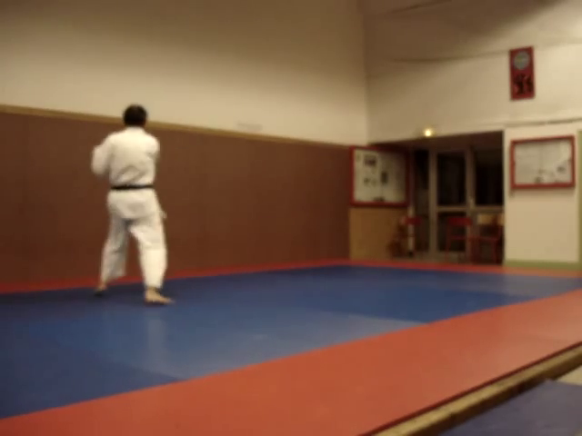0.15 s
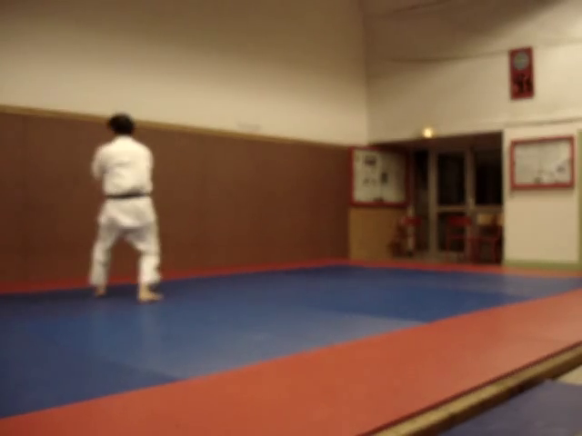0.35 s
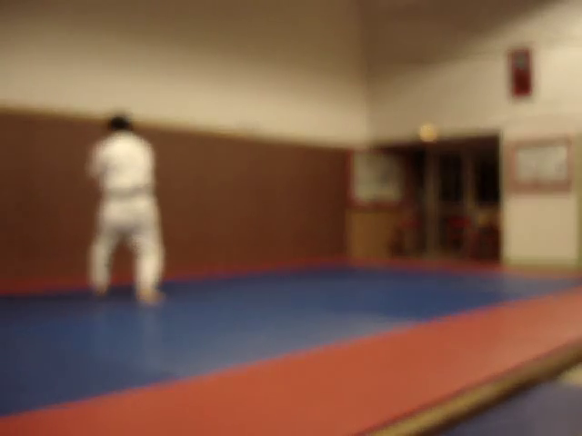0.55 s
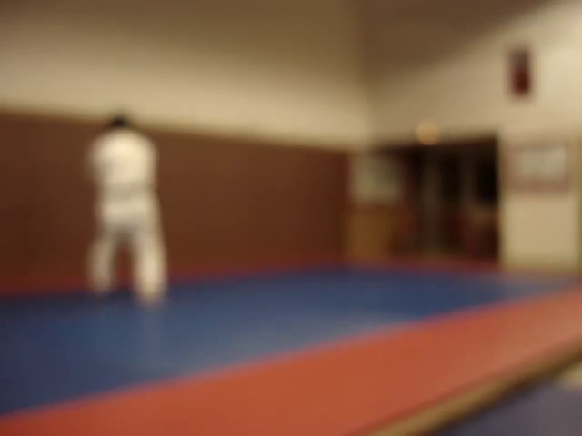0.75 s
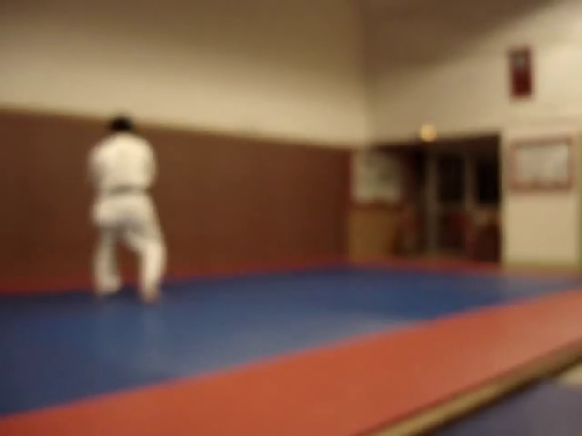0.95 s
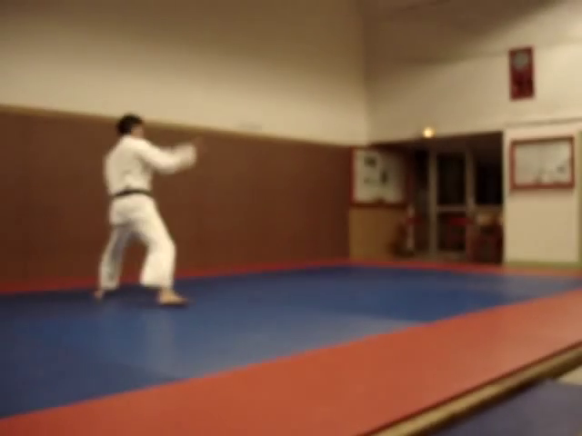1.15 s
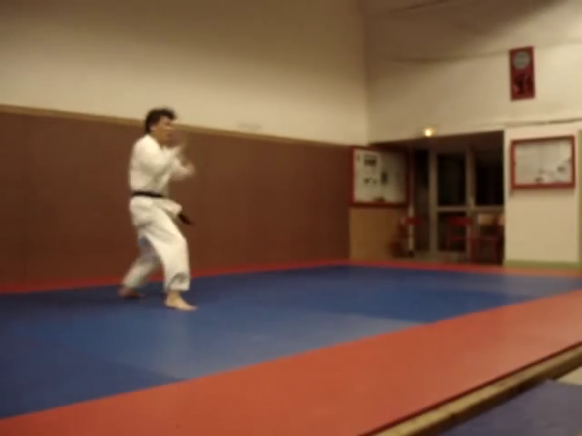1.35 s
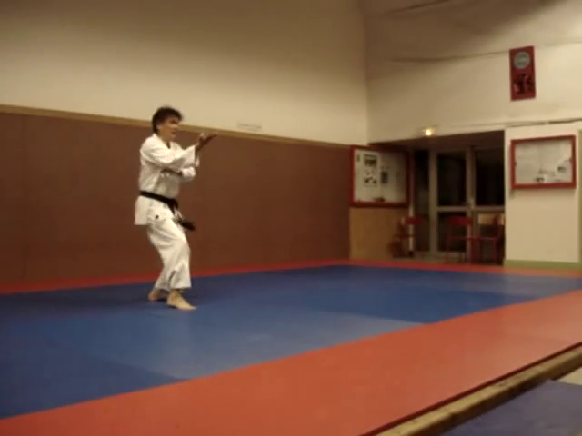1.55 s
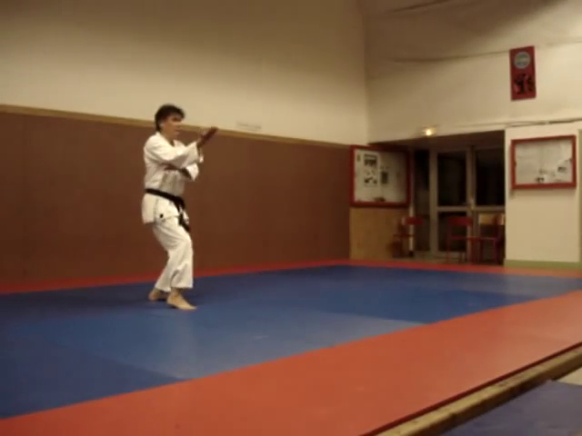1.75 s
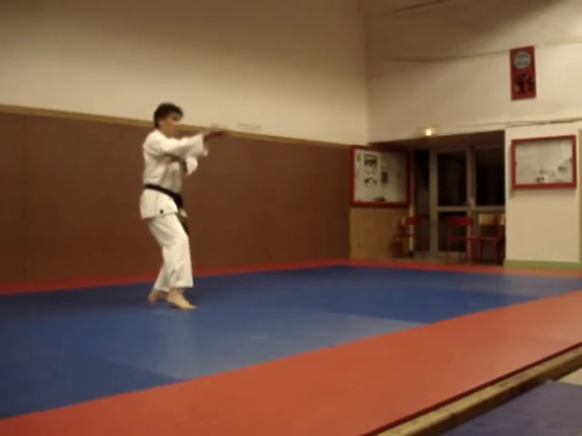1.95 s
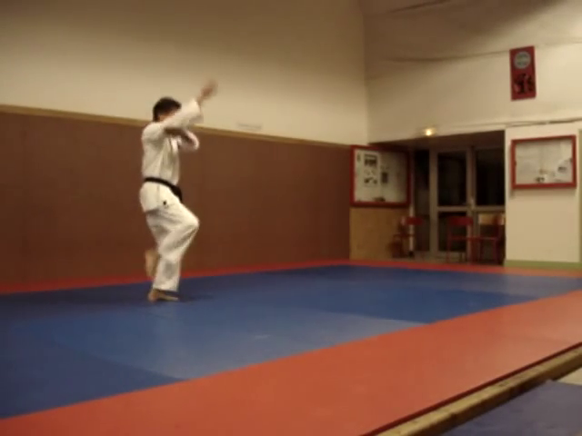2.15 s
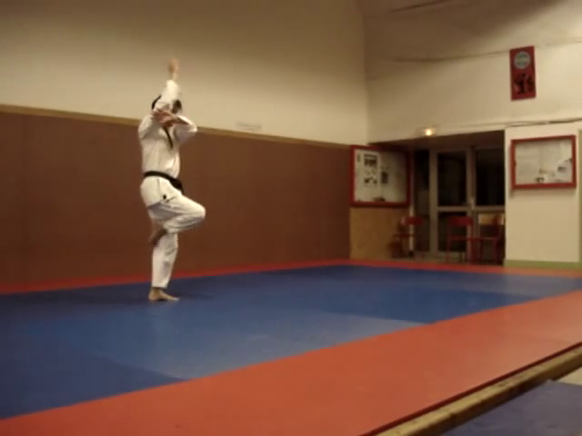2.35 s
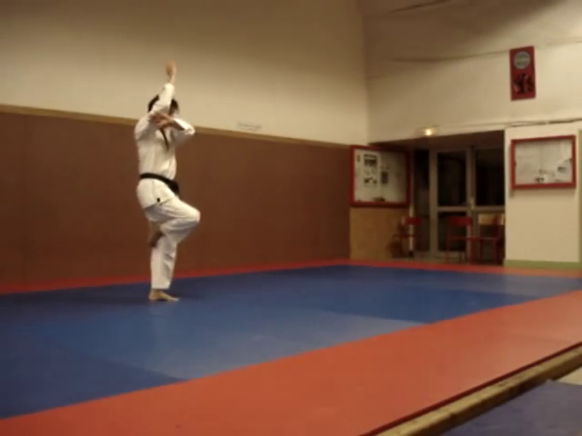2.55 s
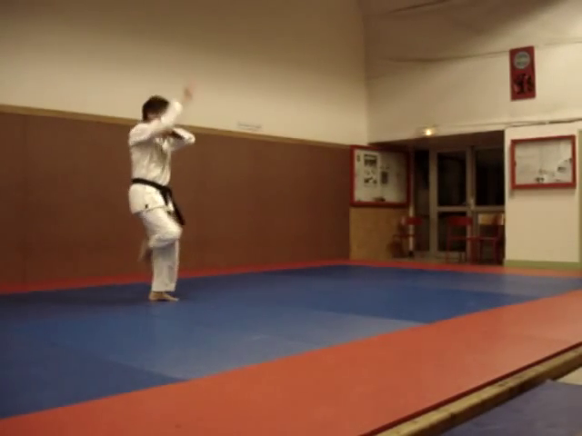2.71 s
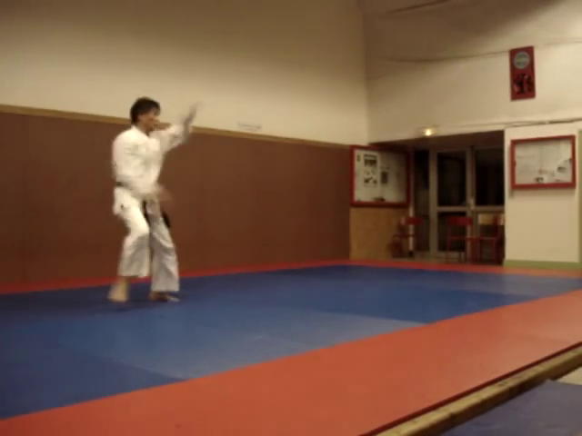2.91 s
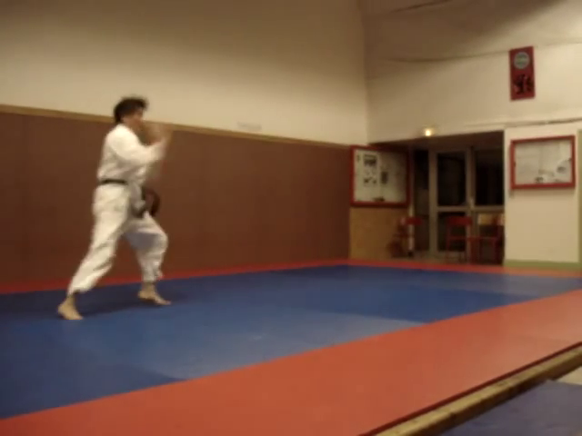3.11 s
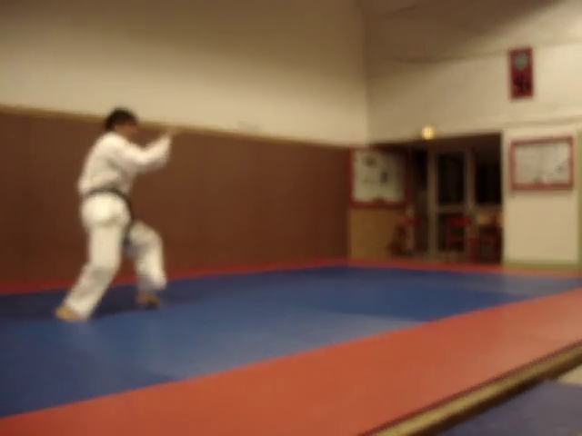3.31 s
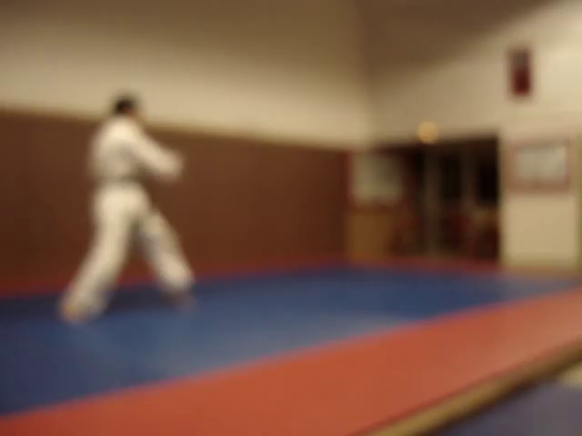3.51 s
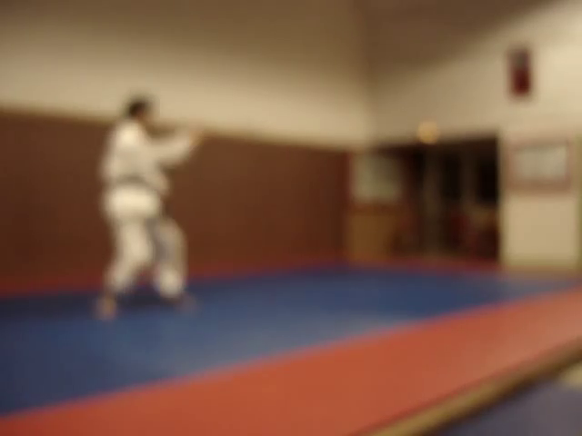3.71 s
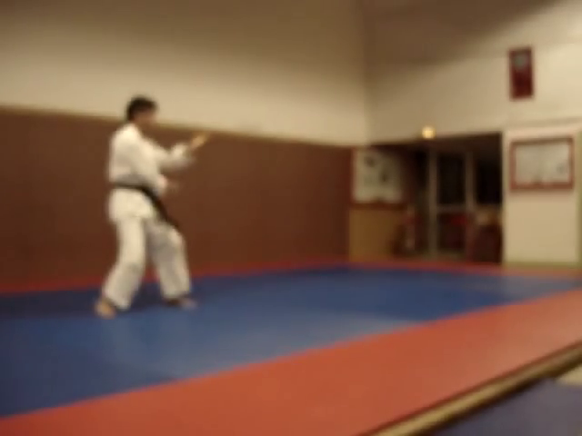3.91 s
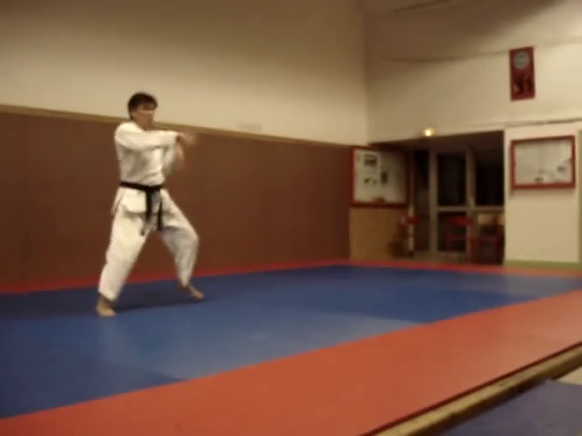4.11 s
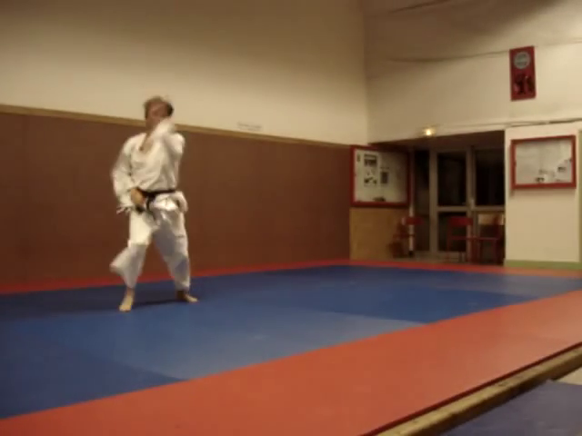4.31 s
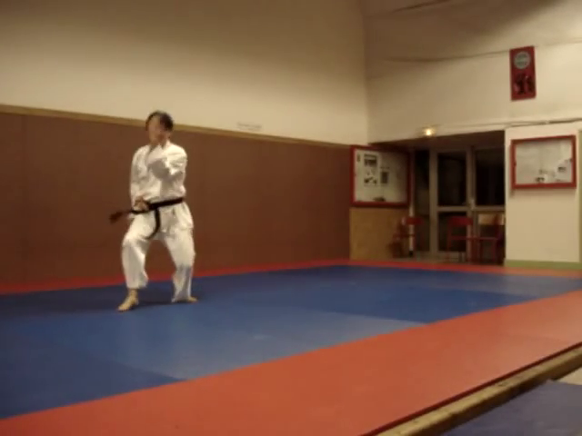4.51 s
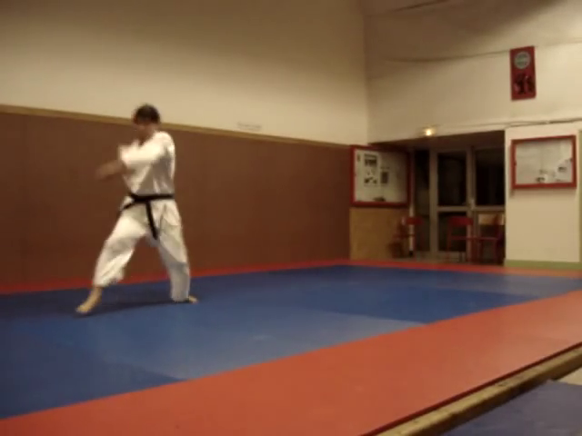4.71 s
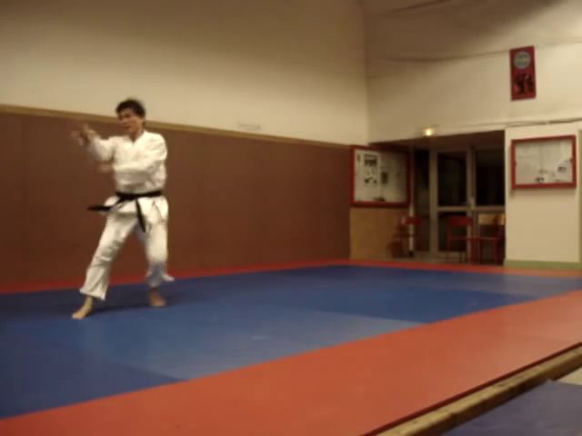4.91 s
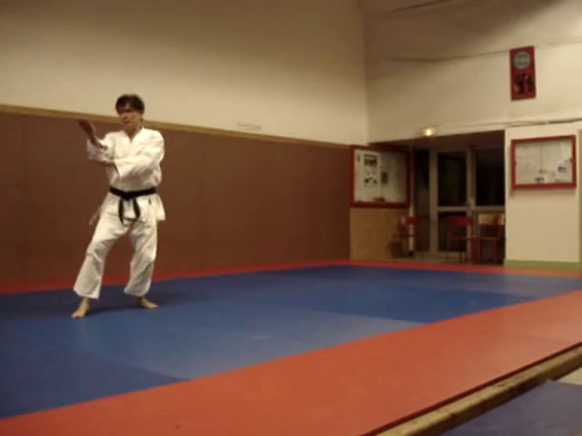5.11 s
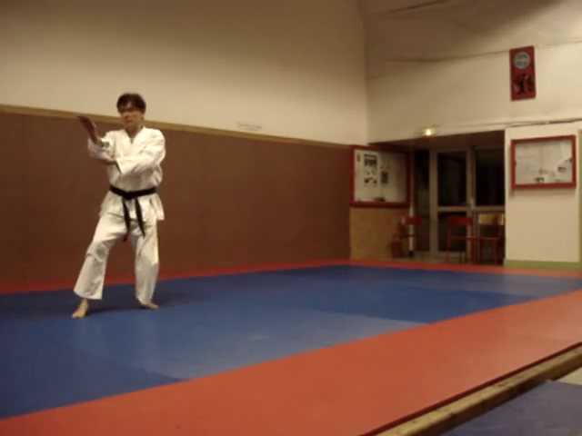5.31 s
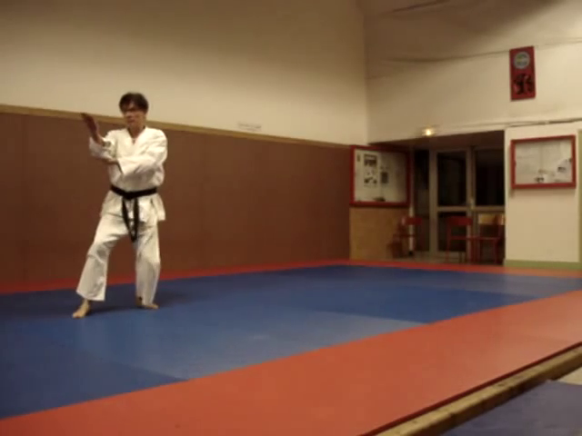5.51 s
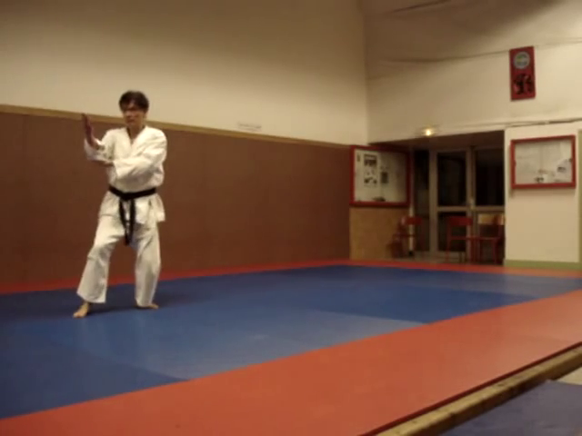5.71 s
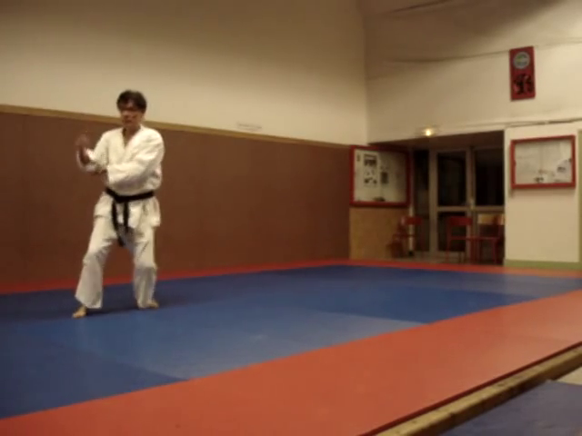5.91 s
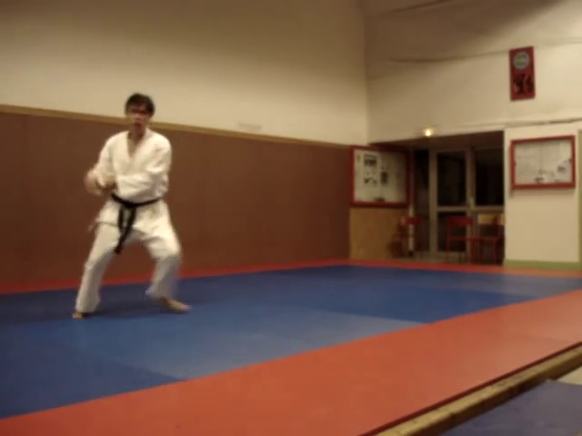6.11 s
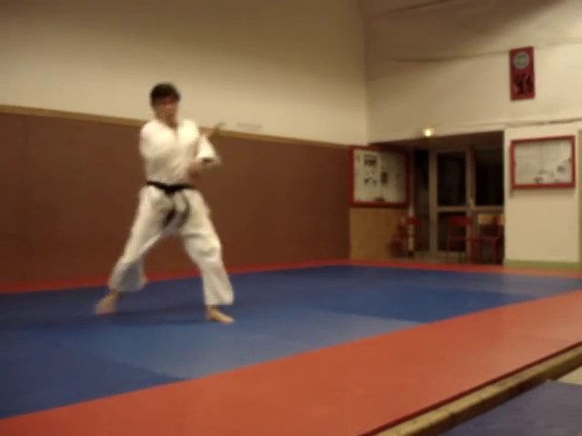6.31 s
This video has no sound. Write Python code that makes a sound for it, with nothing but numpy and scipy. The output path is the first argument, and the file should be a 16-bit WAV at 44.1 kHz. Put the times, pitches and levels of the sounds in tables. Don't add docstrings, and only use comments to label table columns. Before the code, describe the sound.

Stiff cotton flaps, rustles and snaps tight around fast limb movements, while bare heels land softly on sprung matting. Between bursts, bare skin drags and turns with faint beaded whistles; a short chirp and longer squeak come late. The strongest crack falls past the middle, and the end brings one more step and swish. Everything rings in a bare hall, heard from afar through dull, hissy pickup with a thin high whine.

```python
import sys
import numpy as np
from scipy import signal
from scipy.fft import rfft, irfft
from scipy.io import wavfile
from scipy.ndimage import uniform_filter1d, map_coordinates

SR = 44100
rng = np.random.default_rng(int(sys.argv[2]) if len(sys.argv) > 2 else 0)


def ratio_of_db(decibels):
    return 10 ** (np.asarray(decibels, float) / 20)


def to_wav(sig):
    pcm = np.clip(np.atleast_2d(sig), -1, 1) * 32767
    pcm = np.round(pcm).astype(np.int16)
    wavfile.write(sys.argv[1], SR, pcm.T)


N = 280035

# [f/Hz, time to fall 60 dB/s]
HALL_RING = [(60, 0.65), (200, 0.5), (700, 0.86), (2500, 1.62), (5000, 1.74), (10000, 0.52)]
# [t/s, peak level/dB, f of the push/Hz, floor drum share 0-1]
HEELS = [(0.15, -19, 220, 0.02), (0.379, -35.5, 92, 0.4), (0.776, -43.5, 217, 0.37), (1.331, -47, 218, 0.1),
         (1.533, -32.5, 174, 0.52), (3.045, -38, 213, 0.1), (3.133, -36, 158, 0.3), (3.586, -36, 142, 0.1),
         (3.727, -25, 169, 0.32), (4.206, -34, 166.6, 0), (4.305, -22.5, 171, 0.1), (4.622, -39, 202, 0),
         (4.756, -47, 174, 0.2), (4.852, -27.5, 184, 0.28), (5.061, -38, 136, 0.33),
         (6.322, -23.5, 174, 0.4)]
# [f/Hz, level per Hz/dB]
FLAP_COLOUR = [(60, -38.5), (150, -17), (250, -5), (440, 1), (600, -1), (900, 2), (1300, -2), (1900, -7.5),
               (4000, -71)]
# [f/Hz, level per Hz/dB]
RUSTLE_COLOUR = [(600, -55.5), (1200, -7), (1600, -4), (2100, 3), (2800, 2), (3700, -3.5), (4500, -5.5),
                 (6000, -14), (9000, -60.5)]
# [f/Hz, level per Hz/dB]
HISS_COLOUR = [(2000, -38), (3800, -3), (5000, 3.5), (6500, 3), (8000, -1), (10000, -5), (12000, -24)]


def unit(x):
    return x / np.sqrt(np.mean(x ** 2) + 1e-20)


def along(points, hz):
    f, v = np.transpose(points)
    return np.interp(np.log(hz + 1), np.log(f + 1), v)


def causal(points, size=2048):
    colour = ratio_of_db(along(points, np.fft.rfftfreq(size, 1 / SR)))
    cepstrum = irfft(np.log(colour + 1e-6), size)
    cepstrum[1:size // 2] *= 2
    cepstrum[size // 2 + 1:] = 0
    h = irfft(np.exp(rfft(cepstrum)), size)
    return h / np.linalg.norm(h)


def narrow(hz, width_hz, size):
    f = np.fft.rfftfreq(size, 1 / SR)
    band = 1 / (1 + ((f - hz) / width_hz) ** 2)
    return unit(irfft(rfft(rng.standard_normal(size)) * band, size))


def peaked(t, s, rise_s, fall_s):
    return ratio_of_db(-20 * np.maximum((s - t) / rise_s, (t - s) / fall_s))


def folds(db, fineness, loss_db):
    steps_away = np.abs(np.arange(3) - fineness)
    return db - loss_db * steps_away ** 1.23


def still_air():
    # [f/Hz, level per Hz/dB]
    air_colour = [(88, -36), (150, -2), (462, 2), (580, -1.5), (1420, -4), (1530, -4), (6790, -13),
                  (7960, -13), (10000, -21.5), (13000, -73.5), (22000, -120)]
    # [f/Hz, level per Hz/dB]
    rumble_colour = [(20, -1.5), (60, 0), (130, -1), (220, -8.5), (400, -28)]
    # [f/Hz, width/Hz, level/dB]
    whines = [(8015, 45, -69), (380, 60, -68)]
    # [f/Hz, level/dB]
    whine_core = (8030, -66)
    t = np.arange(N) / SR
    hiss, drone = (signal.fftconvolve(rng.standard_normal(N + SR), causal(c))[SR // 2:][:N]
                   for c in (air_colour, rumble_colour))
    shake_db, shake_rise_s, shake_t60_s = -16.5, 0.04, 1.8
    rumble_power = ratio_of_db(-67.5) ** 2
    for s, db, _, share in HEELS:
        shake = peaked(t, s + shake_rise_s, shake_rise_s, shake_t60_s / 3)
        rumble_power = rumble_power + (ratio_of_db(db + shake_db) * share * shake) ** 2
    core_hz, core_db = whine_core
    out = ratio_of_db(-50) * hiss + np.sqrt(rumble_power) * drone
    out += ratio_of_db(core_db) * np.sqrt(2) * np.sin(2 * np.pi * core_hz * t)
    for hz, width, db in whines:
        out += ratio_of_db(db) * narrow(hz, width, size=N)
    return out


def motion(t):
    # [t of fastest motion/s, level/dB,
    # fineness 0 flap - 1 rustle - 2 hiss, wind-up and fall per 20 dB/s (sign ignored)]
    sweeps = [(.01, -49.5, 1.2, -4.6), (.12, -34.5, 0, .08), (.22, -21.5, 0.49, 0.0855),
              (.3, -20.5, 0.16, 0.1521), (.42, -35, 1.1, 0.17), (.6, -48, 0.59, 0.9), (1.16, -46, 0.7, .15),
              (1.26, -34, 0, 0.2), (1.35, -24, .2, 0.09), (1.5, -24, 0.21, 0.1), (1.58, -32.5, 1.1, 0.13),
              (1.75, -50, 1.3, 0.4), (2.2, -55, .8, 0.23), (2.97, -43, 0.34, 0.03),
              (3.04, -21.5, 0.19, 0.0246), (3.105, -28.5, 2, 0.034), (3.188, -25, 1.25, 0.0637),
              (3.24, -26, 0.048, 0.0926), (3.46, -42, 0.35, 0.4), (3.66, -29, 0.2, 0.2),
              (3.73, -30, 0, 0.1652), (3.78, -26.5, 0.79, .06), (4.19, -42.5, 0, 0.2),
              (4.32, -29, 0.085, 0.15), (4.52, -41.5, 0.42, 0.95), (4.78, -35, 0.48, 0.39),
              (4.921, -22.5, 0.8, 0.0675), (5.005, -23.5, 0.11, 0.0619), (5.15, -35, 3.14, 0.27),
              (6.269, -36, 0.44, 0.17),
              (.2, -40, 2, -0.33), (.3, -37, 2, 0.01), (1.52, -35.5, 2, 0.05), (3.62, -39.5, 1, 0.4),
               (4.28, -37.5, 1.6, 0.12), (4.42, -32, .05, 0.07), (4.47, -35, 0.47, 0.02),
               (4.96, -27.5, 1.8, 0.11), (5.019, -28.5, 2, .09), (6.19, -46, .6, -0.25),
               (6.315, -31, 2.04, 0.07), (6.345, -25.5, .1, 0.073)]
    next_fold_db = 7.5
    power = ratio_of_db(folds(-65, 0.41, next_fold_db))[:, None] ** 2
    for s, db, fineness, wind_s in sweeps:
        gains = ratio_of_db(folds(db, fineness, next_fold_db))
        power = power + np.outer(gains, peaked(t, s, wind_s, wind_s)) ** 2
    return np.sqrt(power)


def rustling():
    hz, frames, wash = signal.stft(rng.standard_normal(N), SR, nperseg=256)
    near, power = np.zeros(N), 0
    colours, direct_shares = (FLAP_COLOUR, RUSTLE_COLOUR, HISS_COLOUR), (0.4, 0.45, 0.6)
    for gain, colour, direct in zip(motion(frames), colours, direct_shares):
        grains = unit(rng.standard_normal(N) * ratio_of_db(8.1 * rng.standard_normal(N)))
        moving = grains * np.interp(np.arange(N) / SR, frames, gain)
        near += direct * signal.fftconvolve(moving, causal(colour))[:N]
        power += np.outer(unit(ratio_of_db(along(colour, hz))), gain) ** 2
    release = ratio_of_db(-60 * frames / along(HALL_RING, hz)[:, None]) ** 2
    release /= release.sum(axis=1, keepdims=True)
    stored = signal.fftconvolve(power, release, axes=1)[:, :len(frames)]
    return near + signal.istft(wash * np.sqrt(np.abs(stored)), SR, nperseg=256)[1][:N]


def snaps():
    # [t/s, level/dB, fineness 0-2, smear/ms]
    cracks = [(.136, -32, 0.33, 7.7), (.151, -15, .03, 11), (.163, -19, 0.68, 5.7),
              (.178, -22.5, -0.25, 6.6), (.184, -25, 1.77, 2.5), (.196, -15.5, 0.067, 16),
              (.237, -17.5, 0.32, 14), (1.3265, -21.5, 0.54, 1.1), (1.331, -21, .3, 1.1),
              (1.341, -17.5, 0.62, 19), (1.387, -19.5, 0.81, 3.6), (2.07, -40.5, 1.5, 4),
              (2.089, -39.5, 0.91, 2.1), (2.33, -45, 0.05, 15), (2.351, -36, 0.27, 3.5),
              (3.026, -27, 0.47, 7.4), (3.051, -15, 0.44, 2.6), (3.185, -28, 1.5, 28),
              (3.736, -25, 1.33, 18), (3.753, -21, 0.25, 25), (4.231, -29.5, 0.34, 21),
              (4.273, -30, 0.56, 30), (4.37, -22, 0.56, 14), (4.3755, -11.5, .35, 1.5),
              (4.381, -28.5, .3, 25), (4.463, -37, 0.14, 13), (4.763, -31, .1, 17),
              (4.859, -28.5, 0.32, 1.5), (4.926, -29, 3, 1.5), (6.294, -34, 2, 40)]
    # [t/s, f/Hz, width/Hz, level/dB]
    air_pockets = [(.153, 447, 170, -15), (.17, 300, 150, -23.5), (.1625, 5800, 2500, -26.5),
                   (.176, 8000, 3000, -36), (4.42, 2670, 700, -28.5), (.195, 1880, 600, -20),
                   (1.345, 850, 300, -20), (2.329, 430, 200, -44.5), (2.365, 430, 100, -45),
                   (4.41, 773, 180, -22), (2.351, 1950, 610, -39.5), (1.277, 730, 400, -35),
                   (1.37, 540, 170, -27.5), (3.28, 590, 290, -30.5), (.18, 1150, 350, -21.5),
                   (3.053, 1180, 250, -22.5), (3.177, 5700, 1800, -35), (3.192, 5100, 1400, -34),
                   (4.99, 950, 290, -28), (4.94, 2700, 130, -27), (3.743, 950, 230, -24),
                   (3.765, 990, 320, -23.5), (4.232, 850, 300, -30.5), (4.376, 2450, 840, -23.5),
                   (4.465, 2340, 700, -24.5), (4.391, 450, 252, -28)]
    rows, t = np.array(cracks), np.arange(SR // 25) / SR
    loudness = np.sqrt(SR / 100)
    smear_s = rows[:, -1:] / 1000
    burst = rfft(rng.standard_normal((len(rows), len(t))) * ratio_of_db(-60 * t / smear_s))
    burst = irfft(burst / np.abs(burst), len(t)) * loudness
    burst *= 1 - t / t[-1]
    out = np.zeros(N + len(t))
    for k, colour in enumerate((FLAP_COLOUR, RUSTLE_COLOUR, HISS_COLOUR)):
        drive = np.zeros(N + len(t))
        for (s, db, fineness, _), one in zip(rows, burst):
            drive[round(s * SR):][:len(t)] += ratio_of_db(folds(db, fineness, 10)[k]) * one
        out += signal.fftconvolve(drive, causal(colour))[:len(out)]
    for s, hz, width, db in air_pockets:
        ring = np.sin(2 * np.pi * hz * t) * np.exp(-np.pi * width * t) * (1 - np.exp(-t / 0.003))
        out[round(s * SR):][:len(t)] += ratio_of_db(db) * loudness * ring / np.linalg.norm(ring)
    return out[:N]


def feet():
    out, t = np.zeros(N + SR), np.arange(SR // 3) / SR
    floor_hz = 89.5
    for s, db, hz, share in HEELS:
        push = np.sin(2 * np.pi * hz * t) * ratio_of_db(-60 * t / 0.068)
        drum = share * np.sin(2 * np.pi * floor_hz * t) * ratio_of_db(-60 * t / 0.17)
        soft_start = 1 - np.exp(-t / 0.004)
        out[round(s * SR):][:len(t)] += ratio_of_db(db + 4) * soft_start * (push + drum)
    return out[:N]


def pivots():
    # [start/s, end/s, drag level/dB, fading/dB per s]
    turns = [
        (.66, 1.3, -53, 2),
        (5.217, 6.1, -47, 11),
    ]
    # [f/Hz, width/Hz, octave share 0-1]
    whistles = [(3585, 30, .1), (3510, 35, .03)]
    # [t/s, level/dB]
    catches = [
        [(.69, -47), (.72, -44), (.772, -37.5), (.818, -41), (.912, -43), (.968, -44), (1.016, -43),
         (1.102, -51), (1.19, -46), (1.26, -52)],
        [(5.27, -33.5), (5.352, -33.5), (5.444, -37), (5.535, -40), (5.59, -37.5), (5.69, -40), (5.74, -42),
         (5.96, -55), (6.01, -55)],
    ]
    out, t = np.zeros(N), np.arange(N) / SR
    flutter_db, flutter_hz, lift_s = 3.5, 30, 0.06
    for (start, end, drag_db, fading_db), beads, (hz, width, octave) in zip(turns, catches, whistles):
        tone = narrow(hz, width, size=N)
        tone /= np.sqrt(np.abs(uniform_filter1d(tone ** 2, size=SR // 60)) + 0.1)
        flutter = map_coordinates(rng.standard_normal(size=400), [t * flutter_hz])
        grip = ratio_of_db(drag_db - fading_db * (t - start) + flutter_db * flutter) ** 2
        for s, db in beads:
            grip += (ratio_of_db(db) * peaked(t, s, 0.047, 0.06)) ** 2
        contact = (t > start) * peaked(np.maximum(t, end), end, 1, lift_s)
        out += np.sqrt(grip) * contact * (tone + octave * (tone ** 2 - 1))
    return out


def squeaks():
    # [t/s, length/s, width/Hz, level/dB]
    slips = [
        (4.92, 0.46, 300, -41.5),
        (5.699, 0.38, 70, -53.5),
        (5.776, 0.22, 130, -52.5),
        (6.017, 0.25, 55, -54.5),
        (4.904, 0.047, 46.3, -38),
        (5.5, 0.51, 70, -57),
    ]
    slip_pitches = [3250, 4470, 4150, 4030, 2370, 800]
    out, t = np.zeros(N + 2 * SR), np.arange(2 * SR) / SR
    for (s, length, width, db), hz in zip(slips, slip_pitches):
        fade = ratio_of_db(-60 * np.maximum(t - length, 0) / along(HALL_RING, hz))
        swell = (1 - np.exp(-t / 0.012)) * fade
        out[round(s * SR):][:len(t)] += ratio_of_db(db) * swell * narrow(hz, width, size=len(t))
    return out[:N]


def hall(x, count=10):
    out, t = np.zeros(N), np.arange(2 * SR) / SR
    place = np.arange(N) / N * (count - 1)
    share = np.clip(1 - np.abs(place - np.arange(count)[:, None]), 0, 1)
    for part in np.sqrt(share) * x:
        hz, frames, z = signal.stft(rng.standard_normal(len(t)), SR, nperseg=256)
        t60 = along(HALL_RING, hz)[:, None]
        tail = signal.istft(z * ratio_of_db(-60 * frames / t60) / np.sqrt(t60), SR, nperseg=256)[1][:len(t)]
        tail *= 1 - np.exp(-t / 0.0034)
        walls = rng.uniform(-1, 1, len(t)) * (rng.random(len(t)) < 0.012) * ratio_of_db(-60 * t / 0.1)
        response = tail / np.linalg.norm(tail) + 0.62 * walls / np.linalg.norm(walls)
        response[:2] += [0.44, -0.14]
        out += signal.fftconvolve(part, response)[:N]
    return out


def scene():
    thuds = feet()
    ringing = hall(snaps() + 0.67 * thuds)
    mix = still_air() + rustling() + ringing + 0.56 * thuds + pivots() + squeaks()
    return mix[None]


def low_pass(x):
    return signal.sosfilt(signal.butter(12, 11350, fs=SR, output="sos"), x)


def record(dry):
    # [t/s, length/s, lowest f/Hz, share of patches lost 0-1]
    treble_gaps = [(.105, .055, 2500, .45), (.166, .07, 5000, .15), (.97, .18, 5000, .1),
                   (1.305, .02, 2600, .6), (1.333, .04, 4500, .25), (3.003, .02, 4400, .99),
                   (3.057, .05, 4800, .25), (3.145, .022, 5500, .5), (3.72, .014, 4500, .8),
                   (3.64, .095, 4800, .22), (4.245, .03, 5000, .5), (4.32, .045, 4600, .2),
                   (4.385, .022, 4600, .5), (4.72, .18, 4500, .2), (6.28, .013, 4500, .99)]
    hz, frames, z = signal.stft(dry, SR, nperseg=128)
    luck = rng.random((len(hz) // 2 + 1, len(frames) // 9 + 1))
    luck = np.kron(luck, np.ones((2, 9)))[:len(hz), :len(frames)]
    for s, length, above_hz, share in treble_gaps:
        inside = np.outer(hz > above_hz, (frames > s) & (frames < s + length))
        z = z * np.where(inside & (luck < share), ratio_of_db(-24), 1)
    spectrum = rfft(signal.istft(z, SR, nperseg=128)[1][:, :N])
    band_limit = 1 / (1 + (np.fft.rfftfreq(N, 1 / SR) / 10120) ** 160)
    return low_pass(irfft(spectrum * band_limit, N))


dry = scene()
out = record(dry)
to_wav(out)
```